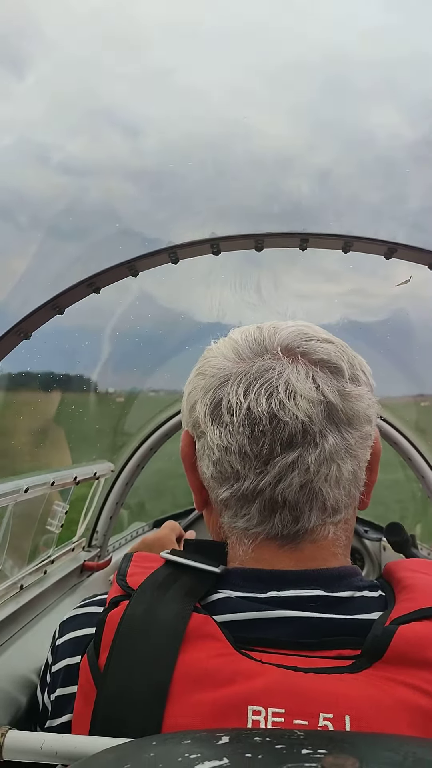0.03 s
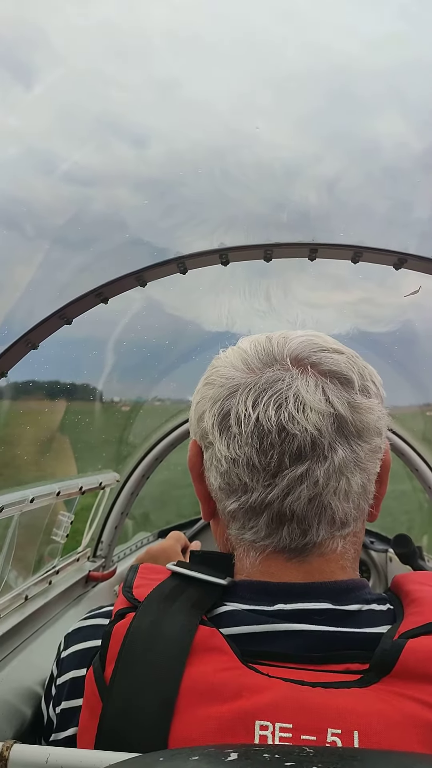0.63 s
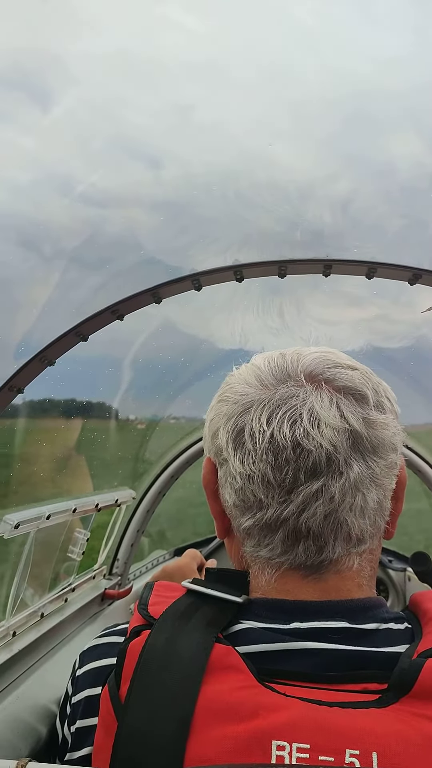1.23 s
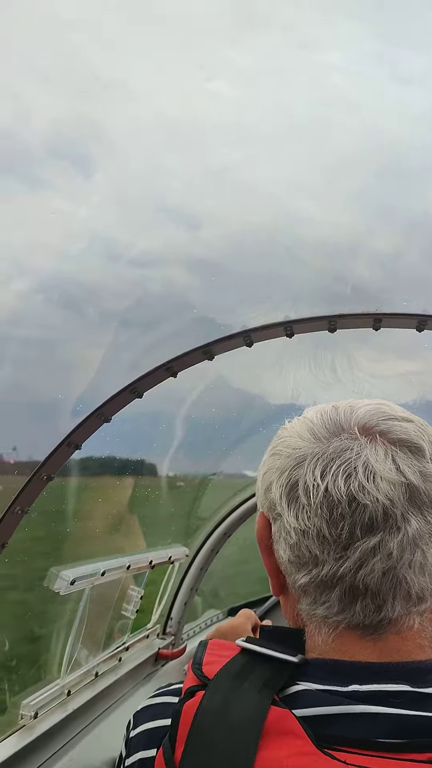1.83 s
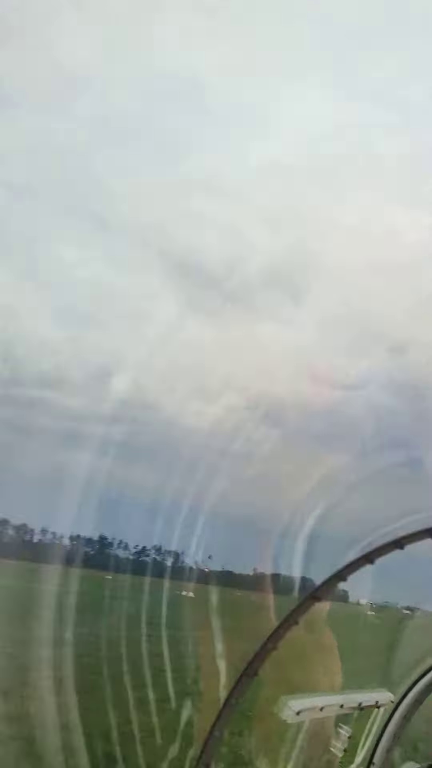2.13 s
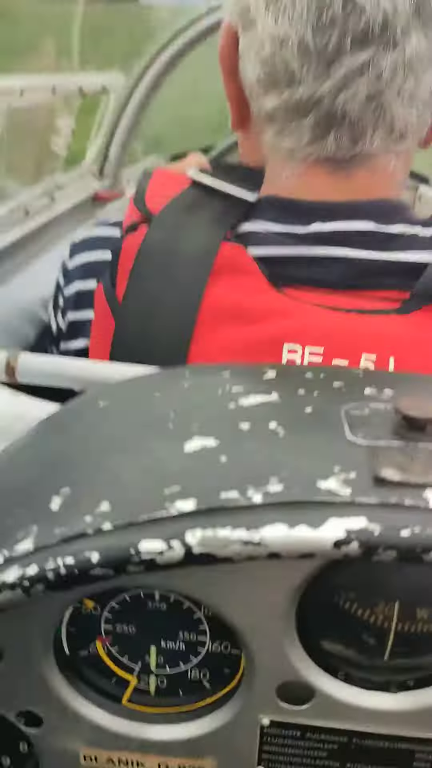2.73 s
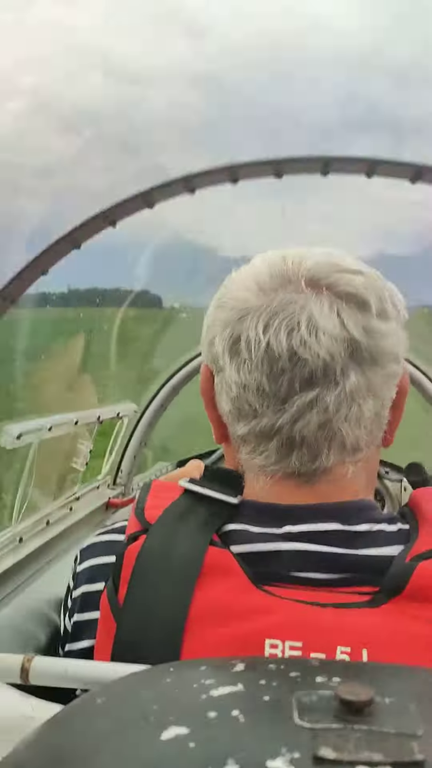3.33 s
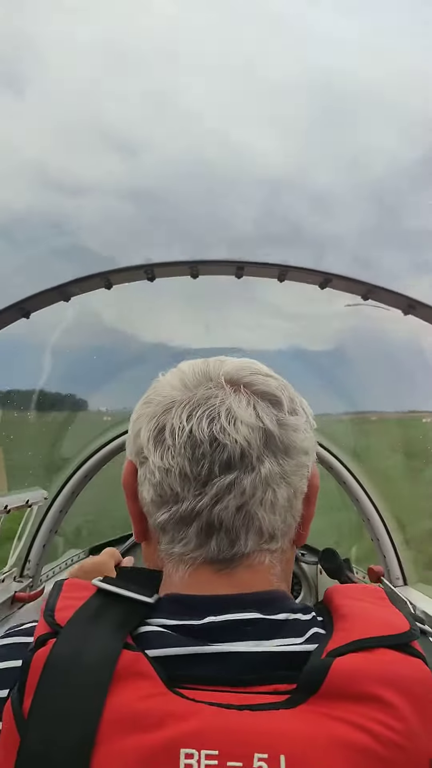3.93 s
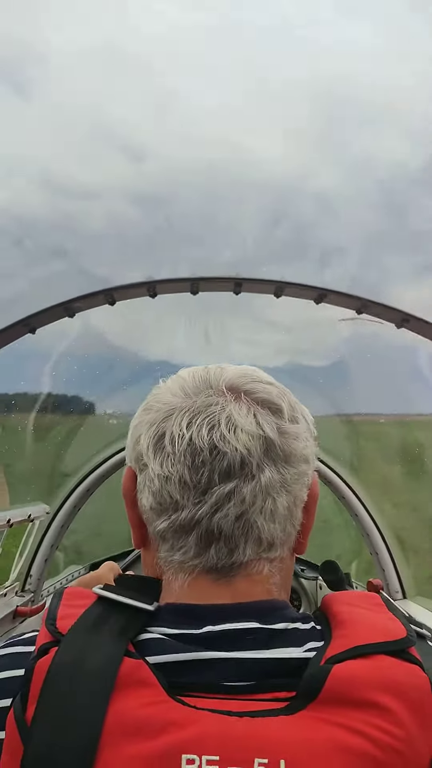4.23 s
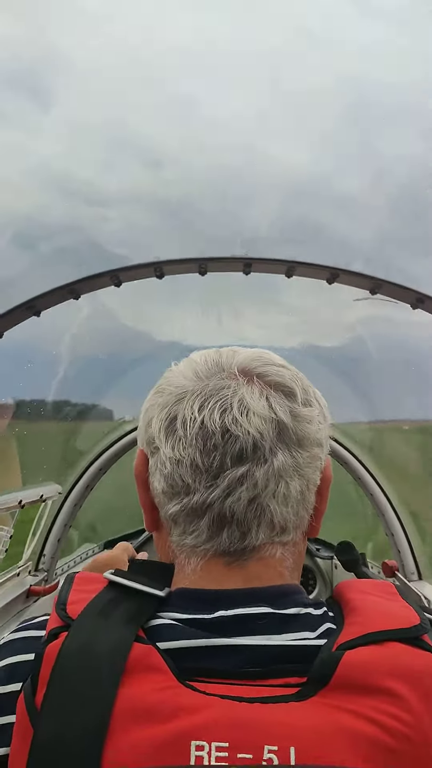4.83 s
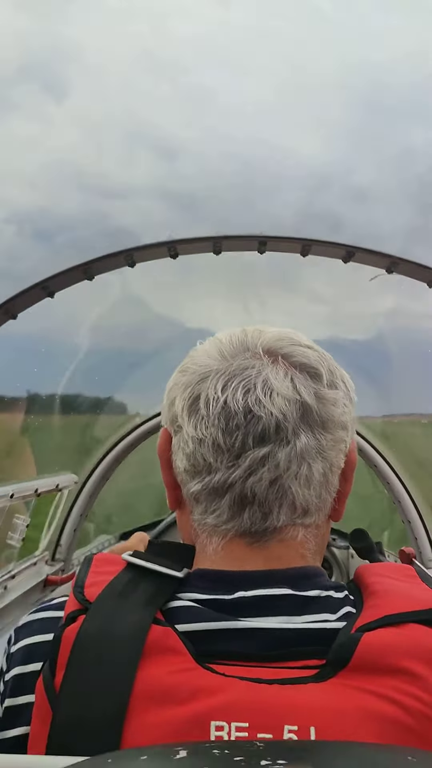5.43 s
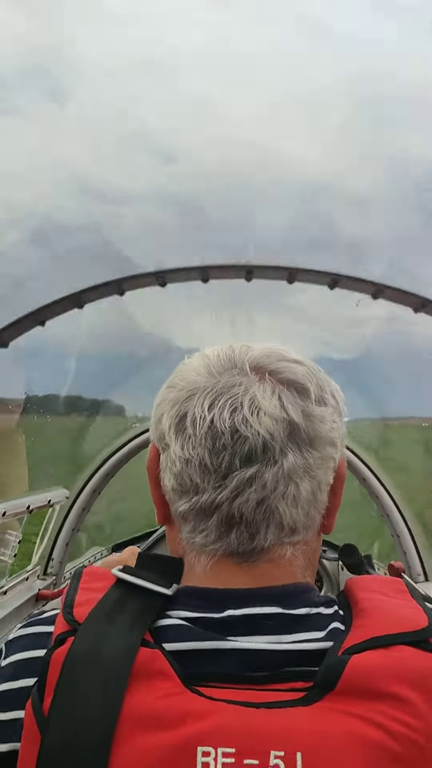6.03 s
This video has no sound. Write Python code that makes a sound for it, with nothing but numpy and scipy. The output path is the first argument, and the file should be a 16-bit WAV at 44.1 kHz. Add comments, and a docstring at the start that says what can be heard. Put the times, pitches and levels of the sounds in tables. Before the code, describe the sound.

Heard from a glider's rear seat under a closed canopy, soft clicks and a brief creak sit over the low, rising hum of a distant engine. Then the aircraft begins moving across a grass field, and a much louder deep rumble takes over, with uneven bumps from the tyre, booming sheet metal and light rattling. A nearby metal part clacks twice hard and once softly, and the airframe knocks three times.

```python
"""A metal glider starts to roll over a grass airfield; stereo microphone in the rear seat, canopy closed.
From below, the wheel rumbles over the turf and bumps thump up through the tyre. All round, the hull
drums and booms, grass swishes, loose parts rattle and the airframe knocks. Close by, fittings click,
the controls scuff and a metal part clacks against its stop, twice hard and once softly.
Far ahead an engine speeds up before the roll, a low hum in here, with a faint dry rasp as it rises."""
import sys
import numpy as np
from scipy import signal
from scipy.fft import rfft, irfft
from scipy.io import wavfile

SR = 44100
rng = np.random.default_rng(int(sys.argv[2]) if len(sys.argv) > 2 else 0)


def dump(signal):
    """Clip the signal to [-1, 1] and save it as 16-bit WAV at the path in sys.argv[1]."""
    limited = np.clip(np.atleast_2d(signal).T, -1, 1)
    pcm = np.round(limited * 32767).astype(np.int16)
    wavfile.write(sys.argv[1], SR, pcm)


N = 272538
TIME = np.arange(N) / SR
ROLL_START_S = 2.0

# ring of the cockpit: f/Hz, t60/s
COCKPIT_DECAY = [(150, 0.62), (400, 0.31), (1000, 0.18), (3000, 0.18), (7000, 0.13), (14000, 0.12)]
# likeness of the microphone's two sides: f/Hz, correlation
MIC_CORRELATION = [(100, .99), (200, .955), (330, .82), (650, .55), (1200, .42), (2500, .12), (8000, .08)]
# balance at the microphone: f/Hz, left minus right/dB
MIC_BALANCE = [(50, 1.4), (160, 0.9), (320, 2), (650, 6.5), (1100, -1), (2000, -1.5), (5000, -3),
               (12000, -2.5)]

# engine, far ahead: t/s, firing rate/Hz, level/dB
ENGINE_RUN = [(0, 49.8, -35.5), (0.151, 51.9, -40.5), (.22, 51.4, -51), (0.449, 52.1, -43),
              (0.718, 51.7, -45), (.9, 61.97, -36), (1.1, 68.05, -35.5), (1.3, 74.3, -38.5),
              (1.5, 75.1, -41), (1.798, 79.5, -45), (6.18, 82, -44.5)]
# its orders: multiple of the firing rate, level/dB
ENGINE_ORDERS = [(0.501, -11), (0.751, -20), (1.001, 4), (1.25, -4.5), (1.751, -4), (1.999, -5.5)]
# what the closed canopy lets through of the hum: f/Hz, gain/dB
CANOPY_GAIN = [(25, -14), (38, -10), (52, -15.5), (68, -3.5), (88, 0), (103, 2), (122, -20), (155, 0.5),
               (200, -45)]

# noise spectra as heard from the seat: f/Hz, relative level/dB
AIR_SPECTRUM = [(20, -13.5), (100, 6.5), (150, -12.5), (250, -14.5), (400, -37.5), (750, -62), (1300, -30),
                (1620, -32), (1900, -45), (2800, -38), (4500, -44), (7500, -73), (9500, -53), (14000, -53)]
RASP_SPECTRUM = [(700, -21), (1600, -1), (2100, -4), (2800, -6), (3500, -16), (6000, -35)]
SCUFF_SPECTRUM = [(90, 1.5), (160, 16.5), (205, 14.5), (260, 12.5), (380, 3.5), (560, -1.5), (850, -2),
                  (1150, -10), (1500, -14), (2600, -34), (4500, -39), (9000, -75)]
CLICK_SPECTRUM = [(200, -7), (900, -1), (1600, -1.5), (3000, 3.5), (4600, -2.5), (7400, 0), (9300, -9),
                  (14000, -10.5)]
KNOCK_SPECTRUM = [(80, 3), (250, 0.5), (520, 4.5), (720, -11), (950, -14), (1350, -33.5), (2000, -23),
                  (2900, -22.5), (4500, -28.5), (7500, -31.5), (14000, -55)]
CLACK_SPECTRUM = [(150, -30), (320, -3.5), (520, -22), (720, -1), (1000, 1.5), (1200, -6), (1400, -9.5),
                  (1800, -13), (2600, -5), (3500, -9), (4600, -13), (7200, -10.5), (9500, -16),
                  (14000, -15.5)]
GRASS_SPECTRUM = [(200, -6), (700, 11), (1500, 7), (2300, 3.5), (3200, 2.5), (4600, -3), (7400, -3.5),
                  (9200, -13), (14000, -43), (16000, -19)]
HULL_SPECTRUM = [(70, -41), (125, 2.5), (205, -1), (260, 0.5), (330, -3), (420, -6), (520, -7),
                 (690, -14.5), (810, -11.5), (950, -14.5), (1200, -26), (1700, -30), (3000, -33.5),
                 (8000, -80)]
PANEL_SPECTRUM = [(90, -20), (135, 7), (162, 10), (180, 2.5), (215, -19.5), (300, -45)]
HEAVE_SPECTRUM = [(10, -17), (22, -7.5), (35, 3.5), (45, -5.5), (60, -14), (120, -81)]
TYRE_SPECTRUM = [(30, -60), (52, -0.5), (70, 6), (100, 2), (130, -14.5), (200, -22.5), (500, -116)]

# modes of the struck parts: f/Hz, relative level/dB, t60/s
LATCH_RING = [(440, -4, 0.13), (587, -25, 0.14), (886, -4, 0.2), (985, 1, 0.14), (1380, -2.5, .15),
              (1900, -13, 0.17), (2260, -4, 0.083), (2800, -21, 0.092), (3400, -8, 0.063), (4370, 2, 0.037)]
KNOCK_RING = [(169, 4.5, 0.088), (268.5, 7.5, 0.054), (323, -7, 0.81), (493, -18, 0.11), (925, -6.5, 0.13),
              (1010, -18, 0.59), (1036, -9, 0.071), (2740, -11, 0.041), (3120, -21.5, 0.14)]
CLACK_RING = [(259.5, 1, 0.47), (339, -10.5, 0.45), (380, -8, 0.46), (679, -7.5, 0.27), (784, -14, 0.46),
              (790, -35, 0.34), (993, -5.5, 0.11), (1026, -6.5, 0.084), (1130, -0.5, 0.15),
              (1317, -17.5, 0.27), (1574, -20, 0.24), (2030, -25, 0.29), (2180, -21, 0.2),
              (2840, -22, 0.15), (3350, -60, 0.046), (3240, -37, 0.037), (7200, -4.5, 0.025)]

# two swells of faint rasp as the far engine speeds up, then brief scrapes: t/s, length/s, level/dB
RASPS_AND_SCRAPES = [(.9, 0.69, -61), (1.5, 0.65, -67.5), (2.32, 0.024, -44.5), (2.465, .03, -48.5),
                     (3.36, 0.11, -44), (3.5, .06, -53), (3.6, .04, -47)]
# scuffs of the controls, tufts brushing the hull: t/s, length/s, level/dB
SCUFF_STROKES = [(0.476, 0.073, -41), (0.778, 0.06, -44), (1.229, .17, -41), (1.298, 0.017, -45),
                 (1.48, 0.11, -46.5), (2.454, 0.03, -31.5), (4.486, 0.026, -30), (4.511, 0.024, -24.5),
                 (5.234, 0.027, -31.5)]
TUFT_STROKES = [(1.97, 0.33, -42), (3.72, .3, -38)]
# a short rising creak: t/s, f/Hz, level/dB
CREAK_GLIDE = [(1.488, 226, -68), (1.531, 280.5, -40), (1.559, 380.8, -50), (1.585, 436, -46.5),
               (1.61, 460, -62)]
# loose fittings, close by: t/s, level/dB, treble tilt/(dB/octave), ring time factor
CLICK_HITS = [(.093, -48, -3, 0.68), (.173, -47, 0.5, 0.85), (0.3456, -44, 1, 0.98), (0.3732, -52, -7.5, 1),
              (.5393, -46, -.5, 0.66), (0.5613, -35.5, -3.5, .9), (.6223, -52.5, -2, .8),
              (0.8312, -44, 0, 1), (0.8609, -51, -3.5, 0.8), (1.0139, -49, -1, 0.96), (1.049, -48, -1, 1),
              (1.2511, -40.5, -8, 0.78), (1.3045, -34, -9, 0.65), (1.3674, -36.5, -8, 0.4),
              (1.4992, -51.5, 0, 0.98), (1.8234, -48, -5, 0.9), (2.173, -30.5, 0, 0.75),
              (2.1999, -32.5, -1, 0.91), (2.2197, -30.5, 11, .7), (2.3745, -30, 7.5, 0.58),
              (2.4493, -38, 5.5, .8), (2.6, -33.5, -5.5, 0.52), (2.8645, -30, -6.5, 0.2),
              (2.9686, -43, -4.5, 0.93), (3.0655, -38.5, -1, 0.67), (3.0967, -37.5, -7, 1),
              (3.1478, -49.5, -1, 0.96), (3.2558, -43.5, -4, 0.3), (3.3555, -39.5, -2.5, 1),
              (3.81, -31.5, 4, 0.9), (3.8645, -29.5, 2.5, 0.88), (3.936, -28.5, 3.5, 0.35),
              (4.136, -34, -6, 0.66), (4.1928, -35.5, -5, 0.36), (4.333, -39.5, -0.5, 0.33),
              (4.377, -42.5, 0, 0.9), (4.52, -36, -8.5, 0.95), (4.5412, -40, -1.5, 0.87),
              (4.705, -42.5, 8, 0.25), (4.8175, -35.5, 0, 0.88), (5.005, -37.5, -1.5, 0.47),
              (5.0552, -37, 2.5, 0.75), (5.1116, -35, 4.5, .3), (5.2332, -29, -9, 0.66),
              (5.3918, -41.5, 3, .6), (5.4029, -36.5, -2.5, 0.69), (5.6423, -40, -0.5, 1),
              (5.8564, -41, 2, .65), (5.899, -36.5, 1.5, .7), (5.9565, -31.5, 2, 0.33),
              (6.065, -46.5, 2, 0.9)]
# dull knocks in the airframe: t/s, level/dB
KNOCK_HITS = [(3.736, -16), (4.945, -20), (5.5794, -21)]
# metal clacks: t/s, level/dB, low modes/dB, treble tilt/(dB/octave), all modes/dB
CLACK_HITS = [(2.6354, -9.5, -6, -1.5, -2), (3.6927, -23.5, 3, -2.7, -13), (4.0121, -14.5, -7, -1.5, 0)]

# how hard the ground shakes the glider: t/s, level against steady rolling/dB
RIDE_ROUGHNESS = [(0, -18), (.9, -34), (1.3, -12.5), (1.6, -23.5), (1.82, -23), (1.9, -5.5), (2.0, -2.5),
                  (2.06, 4.5), (2.501, -4.5), (3.2, -11.5), (3.42, 3), (3.68, -3.5), (3.899, 3.5),
                  (4.15, -0.5), (4.85, -6.5), (5.05, 0.5), (5.45, -1), (5.718, 2.5), (6.18, 1.5)]
# hollows in the turf: t/s at the deepest, length/s, level/dB
TURF_HOLLOWS = [(2.308, 0.34, -26.5), (2.903, 1, -36.5), (3.836, 0.22, -15), (4.425, 0.25, -21.5),
                (4.81, 0.31, -17.5), (5.02, .1, -28), (5.7, .2, -19.5), (5.987, 0.27, -30)]
# jolts from below: t/s, level/dB, f/Hz, time to the crest/s, relative hull shudder/dB
WHEEL_JOLTS = [(1.285, -33.5, 149.7, 0.041, -19), (1.89, -22.5, 72, 0.014, -27.5),
               (2.023, -3, 91, 0.017, -17), (2.085, -23.5, 144, 0.014, -18),
               (2.247, -11, 63.66, 0.037, -19), (2.598, -19.5, 64.2, .008, -15),
               (2.861, -21, 125, 0.0074, -21), (3.47, -15, 69.4, 0.034, -12), (3.74, -16, 97.5, .02, -7.5),
               (3.811, -7.5, 77.5, 0.0086, -2.5), (4.364, -14, 79, 0.011, -20),
               (4.629, -13.5, 61.8, 0.023, -42), (4.79, -15.5, 70.6, 0.042, -18.5),
               (4.975, -11.5, 78.6, 0.019, -23), (5.071, -5, 59.4, 0.0094, -16),
               (5.431, -12.5, 71.6, 0.023, -28), (5.599, -5.5, 65.2, .028, -11.5),
               (5.695, -14, 75, 0.016, -2.5), (6.125, -13, 70, 0.01, -13.5)]


def gain_of(db):
    """Decibels to amplitude."""
    return 10 ** (np.asarray(db) / 20)


def unit_rms(x):
    """Scales to rms 1."""
    return x / np.sqrt(np.mean(x ** 2) + 1e-20)


def read(points, hz):
    """Reads a table on a logarithmic frequency axis."""
    f, value = np.transpose(points)
    return np.interp(np.log(hz + 1), np.log(f + 1), value)


def add(mix, s, sound):
    """Mixes a stereo sound in at time s."""
    part = mix[:, max(round(s * SR), 0):][:, :sound.shape[1]]
    part += sound[:, :part.shape[1]]


def wander(rate_hz):
    """Random drift of rms 1, mostly slower than rate_hz."""
    hz = np.fft.rfftfreq(N, 1 / SR)
    return unit_rms(irfft(rfft(rng.standard_normal(N)) * np.exp(-(hz / rate_hz) ** 2), N))


def diffuse(pair, spectrum, tilt_db=0):
    """Colours two unrelated noises into a field of rms 1 round the microphone, near mono in the bass."""
    hz = np.fft.rfftfreq(pair.shape[1], 1 / SR)
    mid, side = rfft(pair)
    likeness, lean = read(MIC_CORRELATION, hz), gain_of(read(MIC_BALANCE, hz) / 2)
    mid, side = mid * np.sqrt(1 + likeness), side * np.sqrt(1 - likeness)
    left_right = np.array([(mid + side) * lean, (mid - side) / lean])
    colour = gain_of(read(spectrum, hz) + tilt_db * np.log2(np.maximum(hz, 500) / 1000))
    return unit_rms(irfft(left_right * colour, pair.shape[1]))


def steadied(x, span_s):
    """Takes the slow swells out of a noise and leaves its fast flutter."""
    power = signal.fftconvolve((x ** 2).mean(0), signal.windows.hann(int(span_s * SR) + 3), "same")
    return unit_rms(x / np.sqrt(abs(power) + 1e-9))


def impacts(per_s, spread_db, cap):
    """Impulses at random times, the largest cap * spread_db above the smallest."""
    sizes = gain_of(spread_db * np.minimum(rng.exponential(1, N), cap))
    return sizes * (rng.random(N) < per_s / SR)


def patter(per_s, spread_db, wash):
    """Countless tiny blows of uneven size over a smooth wash."""
    power = signal.lfilter([1], [1, -np.exp(-1 / (0.0064 * SR))], impacts(per_s, spread_db, cap=4) ** 2)
    return rng.standard_normal((2, N)) * (unit_rms(np.sqrt(power)) + wash)


def strokes(rows):
    """Gain of sounds that each swell and stop."""
    arches = ((np.clip((TIME - s) / length_s, 0, 1), db) for s, length_s, db in rows)
    return sum(gain_of(db) * np.sqrt(4 * u * (1 - u)) for u, db in arches)


def shaken(level_db, follow, db_per_s):
    """Gain of a part that follows the ride by its own share and drifts up or down during the roll."""
    s, ride_db = np.transpose(RIDE_ROUGHNESS)
    rolled_s = np.maximum(TIME - ROLL_START_S, 0)
    return gain_of(level_db + follow * np.interp(TIME, s, ride_db) + db_per_s * rolled_s)


def burst(spectrum, tilt_db, ring, rise_s, crack, size=16000):
    """A blow scattered round the cockpit: a short crack, then a tail whose treble dies first."""
    t, hz = np.arange(size) / SR, np.fft.rfftfreq(size, 1 / SR)
    noise_bins = rfft(diffuse(rng.standard_normal((2, size)), spectrum, tilt_db))
    centres, t60s = np.transpose(COCKPIT_DECAY)
    bands = (irfft(noise_bins * read(np.c_[centres, one], hz), size) for one in np.eye(len(centres)))
    tail = sum(band * np.exp(-np.log(1000) * t / (t60 * ring)) for band, t60 in zip(bands, t60s))
    return tail * (1 - np.exp(-t / rise_s)) * (1 + crack * np.exp(-t / 0.0013))


def ringing(modes, rise_cycles, low_db=0, size=16000):
    """Modes that build up and die; the high ones reach the microphone's two sides out of step."""
    t, out = np.arange(size) / SR, np.zeros((2, size))
    for hz, db, t60 in modes:
        spread = np.arccos(read(MIC_CORRELATION, hz)) * rng.choice([-1, 1]) / 2
        phase = 2 * np.pi * rng.random() + np.array([[spread], [-spread]])
        envelope = np.exp(-np.log(1000) * t / t60) * (1 - np.exp(-t * hz / rise_cycles))
        out += gain_of(db + low_db * (hz < 500)) * envelope * np.sin(2 * np.pi * hz * t + phase)
    return out


def still_air():
    """The faint, low room tone of the closed cockpit."""
    return gain_of(-48) * diffuse(rng.standard_normal((2, N)), AIR_SPECTRUM)


def engine():
    """Far ahead an engine rises from idle; its lowest orders pass the canopy as a hum."""
    s, firing_hz, db = np.transpose(ENGINE_RUN)
    hz = np.interp(TIME, s, firing_hz) * (1 + 0.0076 * wander(4.1))
    cycles, hum = np.cumsum(hz) / SR, np.zeros(N)
    for order, order_db in ENGINE_ORDERS:
        gain = gain_of(order_db + read(CANOPY_GAIN, order * hz) + 1.36 * wander(20))
        hum += gain * np.sin(2 * np.pi * (order * cycles + rng.random()))
    return gain_of(np.interp(TIME, s, db)) * unit_rms(hum)


def rasp_and_scrapes():
    """A faint dry rasp as the far engine speeds up, then a few brief light scrapes."""
    grain = patter(per_s=150, spread_db=3.5, wash=0.4)
    return strokes(RASPS_AND_SCRAPES) * diffuse(grain, RASP_SPECTRUM)


def creak():
    """Stick and slip speeds up unevenly, with a weaker octave."""
    s, hz, db = np.transpose(CREAK_GLIDE)
    cycles = np.cumsum(np.interp(TIME, s, hz) * (1 + 0.1198 * wander(140))) / SR
    slips = np.sin(2 * np.pi * cycles) + 0.39 * np.sin(2 * np.pi * 2 * cycles)
    return gain_of(np.interp(TIME, s, db, left=-120, right=-120)) * slips


def scuffs():
    """Brief rough rubs against the hull as the controls are moved."""
    grain = patter(per_s=200, spread_db=1.7, wash=0.43)
    return strokes(SCUFF_STROKES) * steadied(diffuse(grain, SCUFF_SPECTRUM), span_s=0.03)


def latch(at_s=0.563, level_db=-38):
    """A small latch snaps once and rings briefly."""
    out = np.zeros((2, N))
    add(out, at_s, gain_of(level_db) * ringing(LATCH_RING, rise_cycles=1.7))
    return out


def tick(tilt_db, ring, ripple_db=4.5):
    """One small fitting with its own resonances; near the microphone it rings less and cracks more."""
    hz = np.geomspace(200, 14000, num=260)
    colour = np.c_[hz, read(CLICK_SPECTRUM, hz) + ripple_db * rng.standard_normal(len(hz))]
    return burst(colour, tilt_db, ring, rise_s=0.0013, crack=1.64 * (1 - ring), size=6000)


def clicks():
    """Single fittings click, a little left or right of the microphone."""
    out = np.zeros((2, N))
    for s, db, tilt_db, ring in CLICK_HITS:
        pan_db = rng.normal(0.7, 1.5)  # left minus right
        add(out, s, gain_of(db + np.array([[1], [-1]]) * pan_db / 2) * tick(tilt_db, ring))
    return out


def rattle(per_s=20, parts=8):
    """Once the wheel turns, loose parts from dull to bright chatter, harder on rougher ground."""
    out = np.zeros((2, N))
    for tilt_db in np.linspace(-2, 7, parts):
        blows = impacts(per_s / parts, spread_db=3, cap=2) * (TIME > ROLL_START_S)
        out += signal.oaconvolve(blows[None], tick(tilt_db, ring=0.42), axes=1)[:, :N]
    return out * shaken(level_db=-48, follow=0.45, db_per_s=-0.36)


def knocks():
    """Play in the airframe is taken up with a dull knock."""
    out = np.zeros((2, N))
    for s, db in KNOCK_HITS:
        scatter = gain_of(-3.5) * burst(KNOCK_SPECTRUM, tilt_db=0, ring=1.92, rise_s=0.00087, crack=0.15)
        add(out, s, gain_of(db) * (scatter + ringing(KNOCK_RING, rise_cycles=0.19)))
    return out


def clacks():
    """Close by, a metal part hits its stop and rings through the hull."""
    out = np.zeros((2, N))
    for s, db, low_db, tilt_db, ring_db in CLACK_HITS:
        scatter = burst(CLACK_SPECTRUM, tilt_db, ring=0.91, rise_s=0.0014, crack=0.3)
        modes = gain_of(ring_db + 1.5) * ringing(CLACK_RING, rise_cycles=0.72, low_db=low_db)
        add(out, s, gain_of(db) * (scatter + modes))
    return out


def grass():
    """Just outside, grass swishes along the hull, louder in the tufts."""
    swish = diffuse(patter(per_s=240, spread_db=1.3, wash=0.41), GRASS_SPECTRUM)
    return swish * np.hypot(shaken(level_db=-48.5, follow=0.88, db_per_s=-1.7), strokes(TUFT_STROKES))


def hull_drum():
    """All round the microphone the shaken sheet metal drums, brighter with speed."""
    blows = patter(per_s=160, spread_db=2.7, wash=0.75)
    dull, bright = diffuse(blows, HULL_SPECTRUM, tilt_db=-5), diffuse(blows, HULL_SPECTRUM, tilt_db=0.4)
    speed = np.interp(TIME, [ROLL_START_S, TIME[-1]], [0, 1])
    drum = steadied((1 - speed) * dull + speed * bright, span_s=0.31)
    return drum * shaken(level_db=-35, follow=0.95, db_per_s=0.49)


def panel_boom():
    """The big panels are shaken into a hollow, wavering boom."""
    boom = steadied(diffuse(rng.standard_normal((2, N)), PANEL_SPECTRUM), span_s=0.12)
    return boom * shaken(level_db=-32, follow=1.3, db_per_s=-0.9)


def heave():
    """The airframe sways on its wheel with a deep rumble, most of all through the hollows."""
    sway = steadied(diffuse(rng.standard_normal((2, N)), HEAVE_SPECTRUM), span_s=0.11)
    sinking = sum(gain_of(db) * np.exp(-(2 * (TIME - s) / length_s) ** 2)
                  for s, length_s, db in TURF_HOLLOWS)
    return sway * np.hypot(shaken(level_db=-32, follow=0.78, db_per_s=2.0), sinking)


def bumps():
    """Each jolt bounces the glider on its tyre for a few cycles and shakes the hull."""
    out, t = np.zeros((2, N)), np.arange(SR // 2) / SR
    for s, db, hz, crest_s, shudder_db in WHEEL_JOLTS:
        swell = (t / crest_s * np.exp(1 - t / crest_s)) ** 2.4
        bounce = swell * np.sin(2 * np.pi * hz * t)
        shudder = burst(HULL_SPECTRUM, tilt_db=0, ring=1.24, rise_s=0.015, crack=0, size=len(t))
        add(out, s, gain_of(db) * (bounce + gain_of(shudder_db) * shudder))
    return out


def wheel(duck_db=-6):
    """Below the seat the tyre rumbles over the turf, dipping in each jolt as the bounce takes over."""
    rumble = steadied(diffuse(rng.standard_normal((2, N)), TYRE_SPECTRUM), span_s=0.35)
    bouncing = sum(np.exp(-((TIME - s - crest_s) / 0.03) ** 2) for s, _, _, crest_s, _ in WHEEL_JOLTS)
    return rumble * shaken(level_db=-26.5, follow=1.1, db_per_s=0.44) * gain_of(duck_db * bouncing)


def scene():
    """Everything that reaches the microphone in the rear seat."""
    room_tone = still_air()
    rolling = heave() + wheel() + hull_drum() + grass() + panel_boom() + rattle() + bumps() + knocks()
    close_by = clacks() + latch() + clicks() + scuffs() + creak()
    return room_tone + rasp_and_scrapes() + engine() + rolling + close_by


def record(dry, edge_hz=14600):
    """The recorder's band limit and full scale."""
    lowpass = signal.firwin(255, edge_hz, window=("kaiser", 9), fs=SR)
    return np.clip(signal.oaconvolve(dry, lowpass[None], "same"), -1, 1)


dry = scene()
out = record(dry)
dump(out)
```